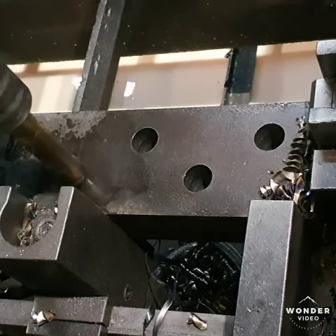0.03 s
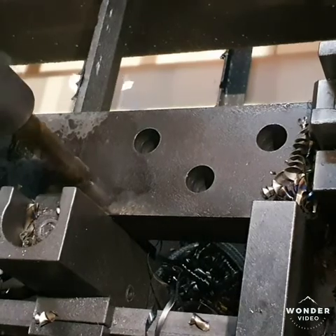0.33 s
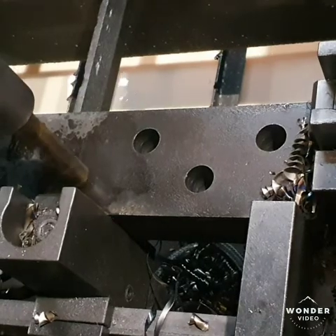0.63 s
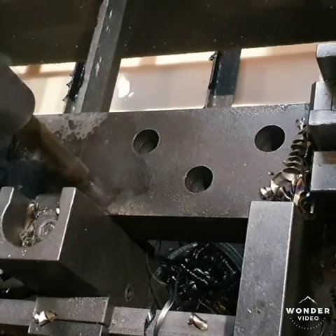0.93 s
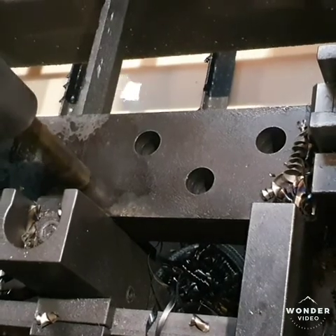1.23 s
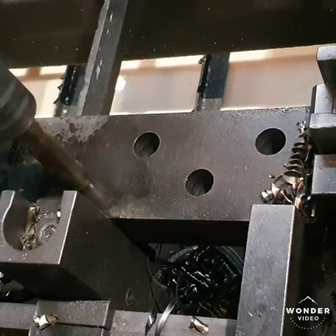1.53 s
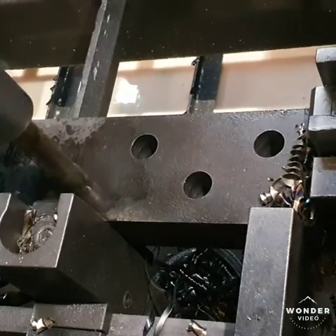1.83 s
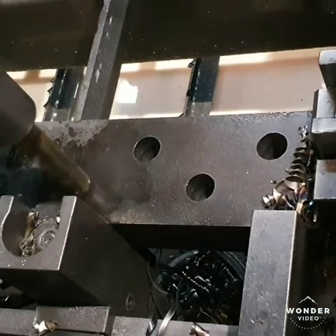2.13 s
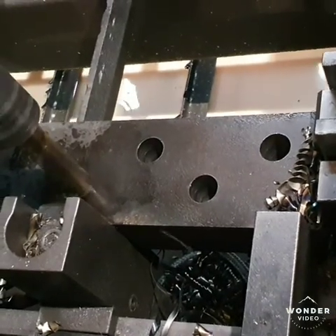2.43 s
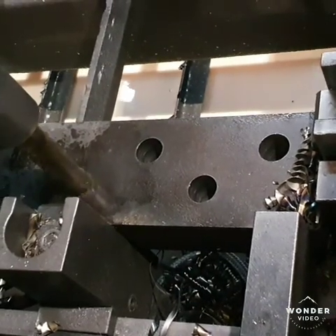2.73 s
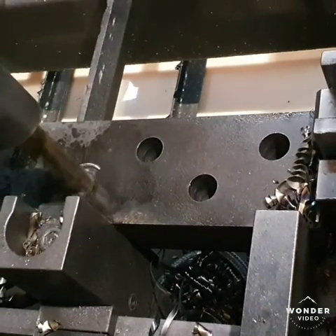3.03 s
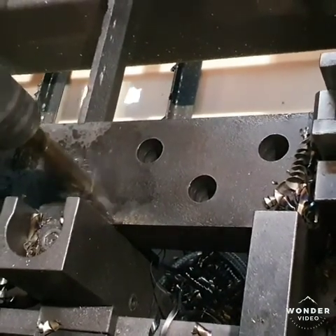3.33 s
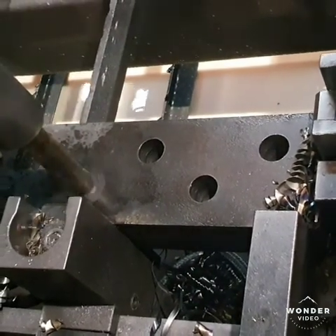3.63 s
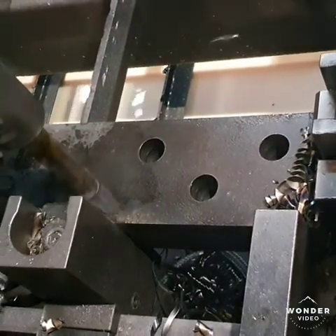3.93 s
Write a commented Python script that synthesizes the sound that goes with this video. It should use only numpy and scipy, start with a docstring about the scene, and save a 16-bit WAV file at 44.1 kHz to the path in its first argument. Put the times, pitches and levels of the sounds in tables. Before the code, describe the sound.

Coolant spray hisses loudly and steadily from a turning drill over a faint motor hum.

```python
"""Drill blowing coolant spray

A two-fluted drill turns close by inside a machine enclosure, blowing coolant. The jet hisses loudly,
swinging in level and colour as the flutes sweep round; it sputters, and droplets patter on the steel.
Underneath are a pump motor's hum, the rumble of the workshop and a couple of soft knocks."""
import sys
import numpy as np
from scipy import signal
from scipy.fft import rfft, irfft
from scipy.io import wavfile

SR = 44100
rng = np.random.default_rng(int(sys.argv[2]) if len(sys.argv) > 2 else 0)


def transcribe(u):
    """Save the signal u as a 16-bit wav file named by the first command-line argument.

    u: samples, shape (n,) or (channels, n), limited to [-1, 1]; the rate is SR.
    q: integer samples, one column per channel.
    """
    v = np.clip(np.atleast_2d(u).T, -1, 1)
    q = np.round(v * 32767).astype(np.int16)
    wavfile.write(sys.argv[1], SR, q)


N = 176400
T = np.arange(N) / SR
HZ = np.maximum(np.arange(N // 2 + 1) * SR / N, 1)


def coolant_jet(spindle_hz=8.775, flutes=2, trim_db=-0.37):
    """The hiss: each band swings with every turn and every passing flute, and the jet sputters."""
    # Bands of the hiss: lower edge/Hz, swing per turn/dB, its peak/turns, swing per flute/dB,
    # its peak/turns, own flutter/dB, share of the sputter, rise/(dB per s)
    bands = [(0, 0, .2, 0.5, 0.33, 0.65, 0.13, 0.4), (906, -0.27, 0.18, -0.54, .15, 1.06, 0.67, -0.2),
             (2290, 0.7, 0.22, -0.2, 0.39, 1.33, 0.7, -0.17), (3260, 0.53, .08, 0.58, 0.39, 0.54, 0.97, .0),
             (5300, 0.14, .08, 0.6, 0.35, .5, 0.83, 0.4), (7400, 0.1, .48, 1, 0.35, 1.27, 0.58, 0.45),
             (9000, 0.54, .51, 0.73, 0.52, 1.28, .8, .5), (11500, 0.1, .46, 1.3, 0.34, 0.6, 0.83, 0.33)]
    # Brief surges and sags of the jet: t/s, level change/dB, half length/s
    surges = [(0.176, -1.5, 0.033), (0.518, -0.5, .035), (0.808, -2.5, 0.02), (0.967, -2.4, 0.022),
              (1.2, -1.6, 0.014), (1.3, 2, .035), (1.47, 1.1, .03), (1.577, 1.1, .025), (2.347, -2, .015),
              (2.526, -2, 0.022), (2.63, 1, .04), (2.96, -0.8, .025), (3.03, 1.2, 0.027),
              (3.162, -1.8, 0.028), (3.33, 0.5, .05), (3.72, 0.6, .06)]
    spectra = stereo_spray()
    sputter_db = 0.45 * drift(rate_hz=13) + sum(db * bump(at, half) for at, db, half in surges)
    turns = spindle_hz * T
    tops = [band[0] for band in bands[1:]] + [SR]
    hiss = 0
    for band, top in zip(bands, tops):
        low, turn_db, turn_peak, flute_db, flute_peak, flutter_db, share, rise = band
        swing_db = turn_db * np.cos(2 * np.pi * (turns - turn_peak))
        swing_db += flute_db * np.cos(2 * np.pi * flutes * (turns - flute_peak))
        unsteady_db = share * sputter_db + flutter_db * drift(rate_hz=20)
        level_db = trim_db + swing_db + unsteady_db + rise * (T - T.mean())
        hiss += from_db(level_db) * irfft(spectra * ((HZ >= low) & (HZ < top)), N)
    return hiss


def stereo_spray():
    """Left and right spectra of the spray: partly alike, each side with its own colour."""
    # Base colour of the hiss and workshop noise on each side: f/Hz, level/(dB per Hz)
    left_colour = [(22, -84), (50, -69.5), (110, -68.5), (370, -67.5), (480, -71), (1000, -67), (1420, -67),
                   (1520, -60.5), (1620, -65), (2200, -64), (2700, -63), (3350, -64.5), (3650, -54),
                   (4200, -50), (4650, -53), (5050, -48.5), (5400, -51), (5980, -48.5), (6450, -55.5),
                   (6750, -54.2), (7120, -52), (7370, -65.5), (7780, -57.5), (8150, -61.7), (9100, -57),
                   (9650, -58.5), (10350, -52.5), (10750, -59.5), (11700, -58.5), (12600, -56.5),
                   (14100, -55), (15600, -58.5)]
    right_colour = [(22, -92), (60, -74.5), (150, -69), (360, -71), (480, -80.5), (800, -74.5),
                    (1200, -74.5), (1700, -66), (2100, -71), (2700, -65.5), (3400, -63.5), (4200, -73),
                    (5100, -76.5), (8200, -75), (9100, -60.5), (10000, -55.5), (10600, -59), (11400, -60.5),
                    (12500, -70.5), (15600, -67)]
    # Stereo image: f/Hz, likeness of the sides (0-1), phase lead of the left/rad
    image = [(100, 0.36, -0.23), (600, 0.54, 1), (1520, 0.39, .5), (2070, 1, 2.5), (2400, 0.27, 0),
             (4200, 0, -0.3), (6040, 0, -8.5), (7200, 0, 6), (8470, 0.76, 0.4), (9400, 0.86, 4.5),
             (11260, 0.2, 4), (13000, 0.4, 5), (15000, .22, 8)]
    alike, lead = over_hz(image)
    left, unrelated = spray(), spray()
    right = alike * left * np.exp(-1j * lead) + np.sqrt(1 - alike ** 2) * unrelated
    colour = from_db(over_hz(left_colour) + over_hz(right_colour))
    return np.array([left, right]) * colour * resonances() * np.sqrt(SR / 2)


def spray(drops_per_s=6000, spread_db=2, drop_gain=0.33):
    """Spectrum of smooth turbulence plus droplet impacts, heard through the enclosure."""
    sizes = from_db(spread_db * np.minimum(rng.exponential(1, N), 5))
    polarity = rng.choice([-1, 1], N)
    drops = rms_one(sizes * polarity * (rng.random(N) < drops_per_s / SR))
    turbulence = rng.standard_normal(N)
    return rfft(rms_one(turbulence + drop_gain * drops)) * wall_reflections()


def wall_reflections(count=30, delay_s=(0.001, 0.02), joint_gain=0.19):
    """Short echoes off the steel walls ripple the spectrum of the hiss."""
    echoes = np.zeros(N)
    polarity = rng.choice([-1, 1], count)
    delays = (rng.uniform(*delay_s, count) * SR).astype(int)
    echoes[delays] = polarity * joint_gain / np.sqrt(count)
    return (1 + rfft(echoes)) / np.sqrt(1 + joint_gain ** 2)


def resonances():
    """Gain curve of the narrow resonances that the jet excites."""
    # Resonances of the work space: f/Hz, width/Hz, boost/dB
    peaks = [(974, 53, 2), (1704, 60, 5), (1970, 54, 4.5), (2645, 37, 7), (2800, 17, 9), (3370, 45, 7.5),
             (3630, 57, 4.5), (3875, 58, 2), (4160, 60, 1.5), (5120, 50, 1.5), (5940, 66, 3.5),
             (6740, 45, 0.5), (9680, 110, 5), (10300, 120, 4.5)]
    return from_db(sum(db / (1 + (2 * (HZ - hz) / width) ** 2) for hz, width, db in peaks))


def pump_hum(speed_wander=0.002, phase_wander_rad=0.32, waver_db=2.5):
    """Motor tones share a slightly wandering speed, and each wavers on its own."""
    # Hum of the pump and drive motors: f/Hz, level/dB
    tones = [(59.2, -51.5), (88.4, -51.5), (107.5, -55.5), (119.9, -55.5), (148.8, -50.5), (176.5, -59.5),
             (210, -58.5), (233.5, -60.5), (296, -57.5), (337, -57), (355.3, -55), (388.5, -58.5),
             (594, -60.5)]
    motor_time = np.cumsum(1 + speed_wander * drift(rate_hz=1.9)) / SR
    hum = 0
    for hz, db in tones:
        phase = 2 * np.pi * (hz * motor_time + rng.random()) + phase_wander_rad * drift(rate_hz=1.5)
        hum += from_db(db + waver_db * drift(rate_hz=5.6)) * np.sqrt(2) * np.sin(phase)
    return panned(hum, pan_db=1.7)


def knocks(low_hz=180):
    """Dull, quickly damped knocks, well to the left."""
    # Knocks: t/s, level before panning/dB, decay/s, top edge/Hz
    strikes = [(3.358, -30, 0.0041, 1100), (3.896, -40, .01, 600)]
    thuds = 0
    for at, db, decay, top_hz in strikes:
        envelope = (T >= at) * np.exp(-np.abs(T - at) / decay)
        thuds += from_db(db) * envelope * band_noise(low_hz, top_hz)
    return panned(thuds, pan_db=10.5)


def frame_rumble():
    """The machine frame rumbles in brief, low swells an octave wide."""
    # Swells: t/s, level/dB, half length/s, centre/Hz
    swells = [(1.31, -47, 0.044, 60), (3.76, -41, .14, 90)]
    return sum(from_db(db) * bump(at, half) * band_noise(hz / np.sqrt(2), hz * np.sqrt(2))
               for at, db, half, hz in swells)


def band_noise(low_hz, high_hz):
    """Noise of unit power between two edges."""
    bandpass = signal.butter(2, [low_hz, high_hz], "band", fs=SR, output="sos")
    return rms_one(signal.sosfilt(bandpass, rng.standard_normal(N)))


def drift(rate_hz):
    """Smooth random modulation with a spread of one."""
    return rms_one(irfft(rfft(rng.standard_normal(N)) / (1 + (HZ / rate_hz) ** 2), N))


def bump(at_s, half_s):
    """Bell-shaped envelope, down to 1/e at half_s either side of its peak."""
    return np.exp(-((T - at_s) / half_s) ** 2)


def over_hz(rows):
    """A curve over log frequency for each table column after the first."""
    hz, *columns = np.transpose(rows)
    return [np.interp(np.log(HZ), np.log(hz), column) for column in columns]


def panned(x, pan_db):
    """Raise the left side and lower the right, each by pan_db."""
    return x * from_db(np.array([[1], [-1]]) * pan_db)


def from_db(db):
    """Decibels to gain."""
    return 10 ** (np.asarray(db) / 20)


def rms_one(x):
    """Scale to unit power."""
    return x / np.sqrt(np.mean(x ** 2) + 1e-20)


def scene(pan_db_per_s=-0.18):
    """The jet, easing from the left towards the centre, over hum, rumble and knocks."""
    jet = panned(coolant_jet(), pan_db_per_s * (T - T.mean()))
    return jet + pump_hum() + frame_rumble() + knocks()


def record(dry, ceiling=0.9, cutoff_hz=15800):
    """Round off the highest peaks and cut the top end steeply."""
    rounded = dry / (1 + (dry / ceiling) ** 8) ** (1 / 8)
    lowpass = np.clip((cutoff_hz - HZ) / 100 + 0.5, 0, 1)
    return irfft(rfft(rounded) * lowpass, N)


dry = scene()
out = record(dry)
transcribe(out)
```